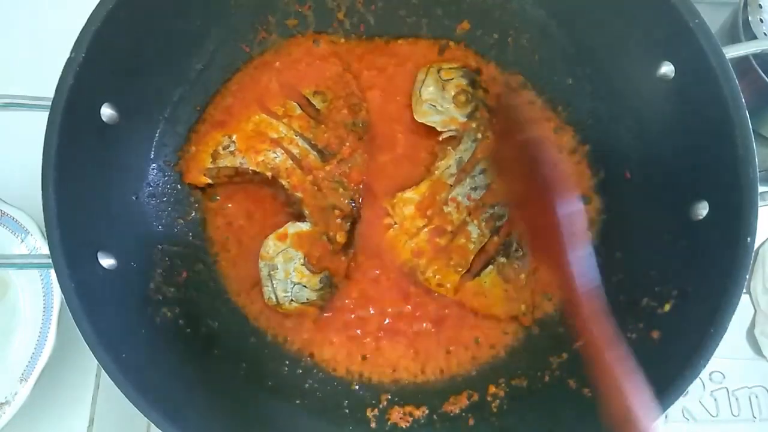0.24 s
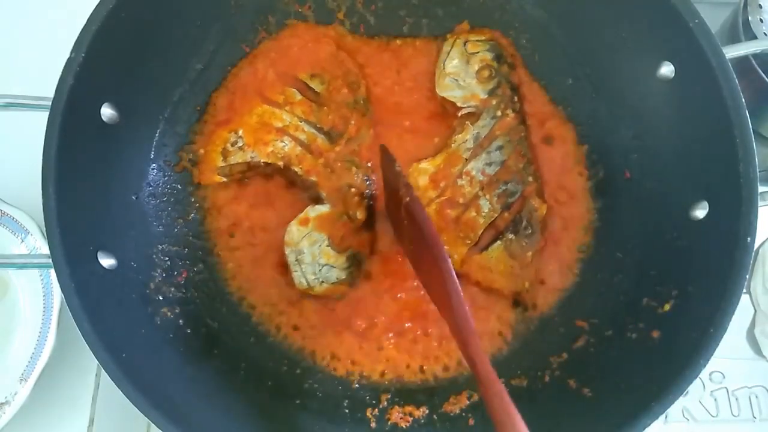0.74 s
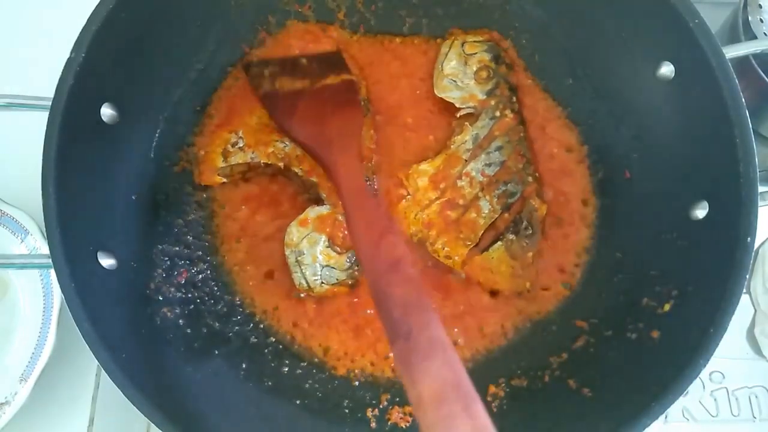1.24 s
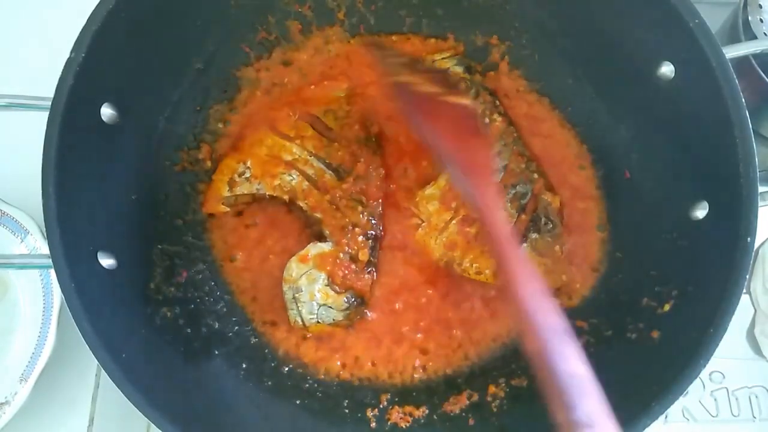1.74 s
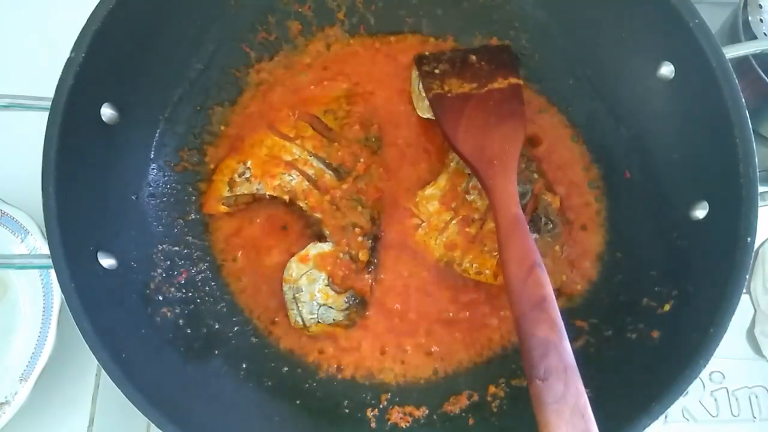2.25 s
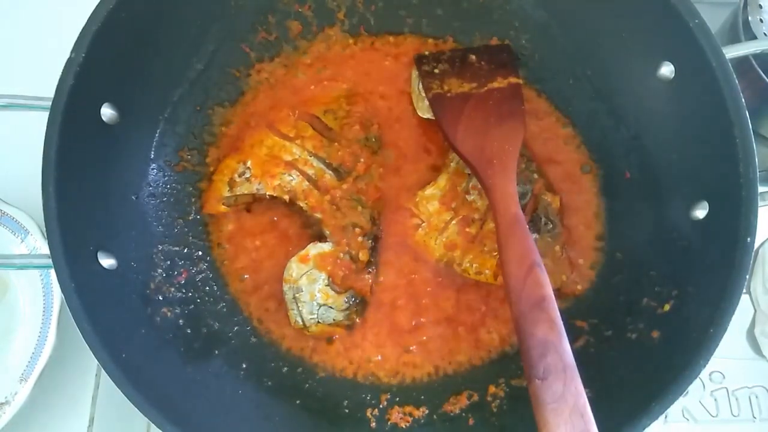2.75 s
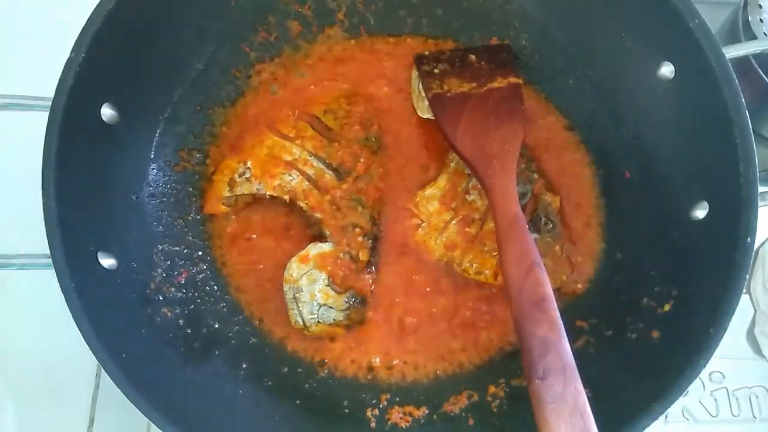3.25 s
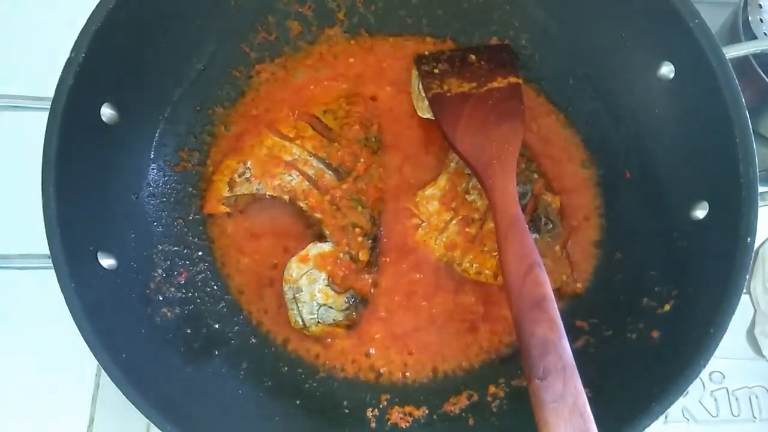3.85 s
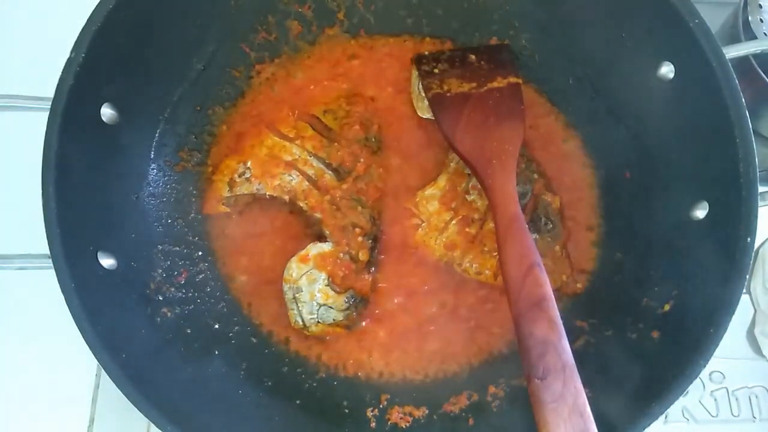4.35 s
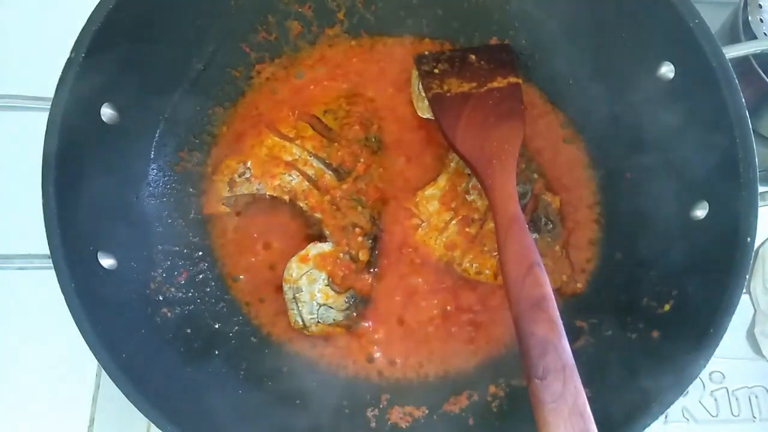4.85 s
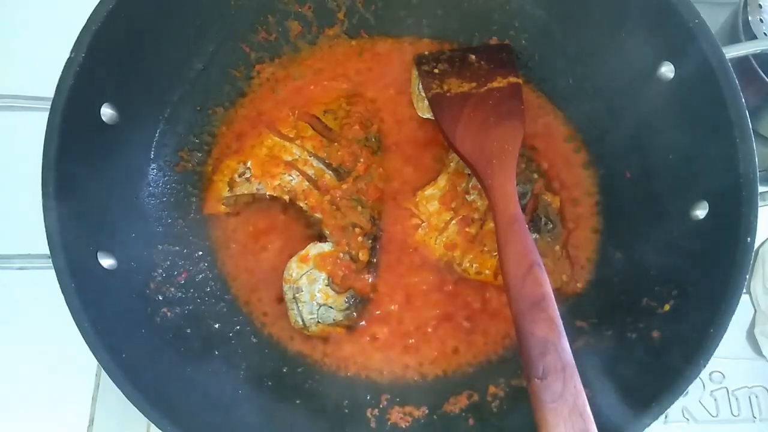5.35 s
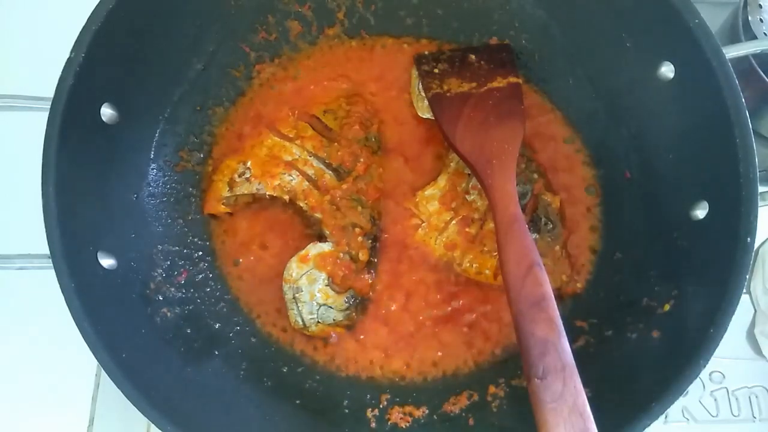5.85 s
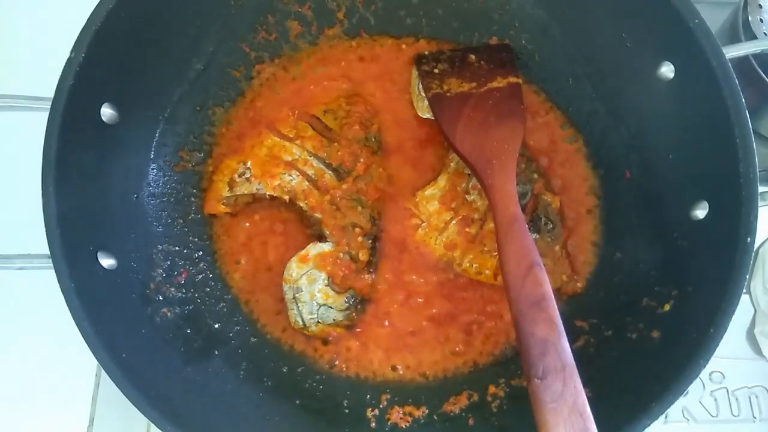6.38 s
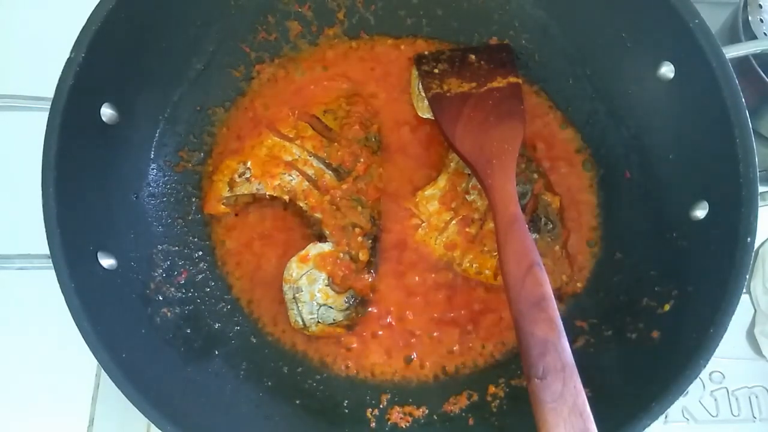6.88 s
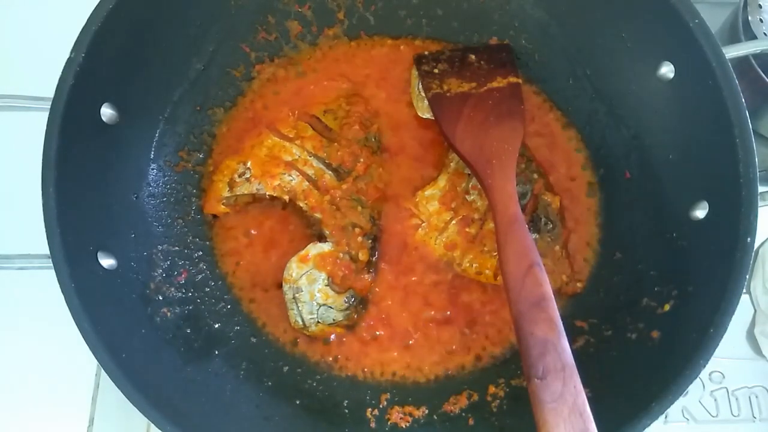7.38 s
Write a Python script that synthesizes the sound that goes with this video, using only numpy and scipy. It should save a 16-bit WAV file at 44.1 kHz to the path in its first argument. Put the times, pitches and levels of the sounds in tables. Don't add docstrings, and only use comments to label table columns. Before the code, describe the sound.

Close, crackling simmer of fish in thick sauce, popping blisters and snapping fat, with spatula thuds and clacks over a low, steady burner roar.

```python
import sys
import numpy as np
from scipy import signal
from scipy.fft import rfft, irfft
from scipy.io import wavfile
from scipy.ndimage import uniform_filter1d

SR = 44100
rng = np.random.default_rng(int(sys.argv[2]) if len(sys.argv) > 2 else 0)


def unload_audio(sound):
    columns = np.transpose(np.atleast_2d(sound))
    steps = np.round(np.clip(columns, -1, 1) * 32767)
    wavfile.write(sys.argv[1], SR, steps.astype(np.int16))


def ratio(d):
    e = np.asarray(d, float) / 20
    return 10 ** e


N = 336042

# (frequency [Hz], density [dB per Hz])
FIZZ_SPECTRUM = [(3500, -23), (5000, -10), (7000, -4.5), (8500, -2.5), (10000, 0.5), (12000, -6),
                 (13200, -4.5), (15500, -11.5), (19000, -13.5)]
# (frequency [Hz], density [dB per Hz])
BUBBLING_SPECTRUM = [(1800, -51), (2600, -6), (3200, -6.5), (3700, -9), (4200, -3.5), (6000, -5),
                     (7500, -2), (10000, -29)]
# (time [s], level [dB])
SIMMER_VIGOUR = [(0, -15.5), (.78, -15.5), (.9, -15), (1.3, -16.5), (2.1, -15), (2.4, -16), (2.85, -14.5),
                 (3.6, -15.5), (4.2, -16), (5.0, -15), (6.4, -14), (6.75, -14), (7.62, -14)]
# (time [s], lift [dB])
FIZZ_FLARES = [(.09, 2), (.31, 1), (.49, 1), (.66, 2), (.725, 3), (.80, 2.5), (.835, -1), (1.82, 0),
               (2.09, 2), (2.78, 3), (3.31, 3), (3.43, 2.5), (3.6, 1.5), (3.81, 2), (3.925, 2.5),
               (4.39, 1.5), (4.985, 3.5), (5.3, 1.5), (5.455, 2), (5.63, 0.5), (5.755, 2), (6.02, 2),
               (6.15, 2), (6.28, 2.5), (6.485, 4.5), (6.91, 4.5), (7.0, -1), (7.09, -1), (7.18, 1.5),
               (7.41, 3)]
# (time [s], lift [dB])
SAUCE_BLISTERS = [(.1, 0), (.31, 3.5), (.92, 2), (.98, 1), (1.57, 3.5), (2.275, 4.5), (2.46, 2.5),
                  (2.68, 6), (3.0, 1.5), (3.36, 3), (3.77, 5), (3.83, 4), (3.91, 4), (4.04, 3.5),
                  (4.245, 1), (4.5, 1), (4.78, 1), (5.03, 2.5), (5.355, 5.5), (5.43, 4.5), (5.51, 3),
                  (5.62, 2), (5.755, 4), (5.955, 4), (6.22, 4.5), (6.83, 3.5), (6.9, 3), (6.97, 2.5),
                  (7.25, 0), (7.56, 1.8)]
FLARE_S, BLISTER_S = 0.0086, 0.0099
BUBBLE_DB, BUBBLE_FOLLOWS = -23, 0.14
SETTLES_S, SETTLING_S, SETTLED_DB = 2.1, 0.018, 2

# (time [s], peak [dB], pitch [Hz], gain-control dip that follows [dB])
FAT_SPITS = [(0.0009, 11, 11200, 0.5), (0.123, 3, 8700, 4.5), (0.2087, 8, 8600, 0.5),
             (0.8139, 2, 9000, 4.5), (0.862, 7, 8500, -1.5), (0.8843, 6, 9300, 3), (0.8295, 3, 9000, 1.5),
             (2.416, -8, 6700, 0), (2.457, 2, 9000, 1.5), (3.0086, 4, 8600, -1), (3.182, -6, 8400, 1),
             (3.386, -5, 8800, 0), (3.6328, -1, 10100, 2.5), (4.0123, 2, 7200, 0), (4.0653, -3, 9000, 2),
             (4.3443, 3, 10000, 2.5), (4.6195, 6, 10300, 1), (4.696, 4, 9500, 0.5), (5.2833, 9, 10900, 0.5),
             (5.4722, -4, 9100, 1), (5.9426, 3, 10800, 1), (6.0552, 12, 6700, 0.5), (6.15, 9, 8900, 1),
             (6.6281, 10, 10200, 1.5), (6.665, 9, 8900, -0.5), (6.6984, 0, 10200, 2.5),
             (6.829, -1, 11300, 4.5), (6.9245, 5, 6800, 1), (7.1012, -2, 10600, 1), (7.49, -1, 9000, 1)]
SMALL_SPITS, SMALL_SPIT_DB, SMALL_SPIT_HZ = 40, 0, 9500

# (time [s], peak [dB], pitch [Hz])
HOLLOW_THUDS = [(0.129, -19, 245), (0.17, -25, 277), (0.74, -21, 256), (1.559, -28, 229), (1.872, -29, 261),
                (1.928, -33, 264), (2.089, -33, 254), (2.274, -26, 248), (2.31, -29, 243),
                (2.387, -20, 297), (2.406, -21, 270), (2.399, -24, 185), (5.836, -31, 358),
                (5.859, -30, 253), (5.926, -37, 393), (5.988, -27, 260), (6.007, -32, 296),
                (6.072, -26, 286), (6.091, -27, 205), (6.259, -32, 340), (6.309, -31, 274),
                (6.378, -25, 301), (6.509, -38, 325), (6.635, -28.5, 314)]
# (time [s], peak [dB], main mode [Hz], second mode [Hz], third mode [Hz])
WOOD_CLACKS = [(2.3, -27, 755, 1000, 1250), (2.386, -16.5, 666, 872, 991), (2.386, -21, 1480, 1260, 1760),
               (5.836, -18.5, 666, 456, 1280), (5.839, -20, 1250, 1360, 1060), (5.93, -26, 560, 420, 1170),
               (5.97, -23, 640, 613, 904), (6.008, -17, 633, 448, 890), (6.072, -24.5, 472, 694, 1000),
               (6.375, -22.5, 623, 800, 760), (6.391, -25.5, 612, 560, 730)]
THUD_T60_S, CLACK_T60_S, SCUFF_T60_S = 0.1, 0.17, 0.1

# (frequency [Hz], density [dB per Hz])
FLAME_SPECTRUM = [(60, -40), (130, -38), (200, -14), (270, -11.5), (380, -11), (500, -9.5), (750, -3),
                  (1200, 0), (2500, -2.5), (3400, -9.5), (5000, -55)]
# (frequency [Hz], width [Hz], lift [dB])
STOVE_HOLLOWS = [(260, 48, 2), (506, 7, 8.5), (636, 10, 5), (755, 75, 5), (991, 85, 4)]
FLAME_DB, FLAME_FOLLOWS = -27, 0.091

# (start [s], end [s], lift [dB])
SPATULA_STROKES = [
    (.18, .35, 12),
    (.45, .85, 9),
    (.95, 1.05, 8),
    (1.75, 1.85, 10),
    (2.05, 2.152, 12),
    (2.28, 2.65, 11),
    (5.8, 6.25, 6),
]
RUMBLE_DB, RUMBLE_FALL_DB_PER_S, STROKE_EDGE_S = -53, 0.5, 0.04

# (frequency [Hz], gain [dB])
MIC_RESPONSE = [(20, -38), (100, -19), (160, -10.5), (220, -0.9), (11000, 0.32), (12500, 1.5),
                (13000, -3.5), (15700, -0.5)]
MIC_TOP_HZ, SELF_NOISE_DB = 15740, -47.5
DUCK_ATTACK_S, DUCK_RECOVERY_S = 0.0013, 0.044
CONTRAST = 0.055
# (time [s], low edge [Hz], high edge [Hz], level [dB])
SIDE_FLECKS = [
    (.901, 8200, 9700, -30),
    (.901, 13000, 14500, -35),
    (1.737, 10300, 11800, -27),
    (2.062, 5600, 6900, -28),
    (3.711, 13000, 14500, -35),
    (4.477, 13800, 15200, -33),
]


def sizzle(fizz_db, bubble_db):
    fits = drift(16.0)
    fizz = ratio(-4.0) * bursts(FIZZ_SPECTRUM, 8000, 2.2 * fits, 4.8, 20.4, 0.78, count=16)
    fizz = fizz + ratio(-1.5) * hiss(FIZZ_SPECTRUM, 0.083 * fits, 1.3, 42.0)
    fizz = fizz + ratio(-14.0) * bursts(FIZZ_SPECTRUM, 500, 2.7 * fits, 3.0, 120.0, 1.1, count=19)
    boil = ratio(-8.0) * bursts(BUBBLING_SPECTRUM, 2500, 2.0 * fits, 2.3, 23.5, 0.59, count=13)
    boil = boil + ratio(-1.0) * hiss(BUBBLING_SPECTRUM, 0.14 * fits, 1.84, 37.0)
    boil = boil + ratio(-10.0) * bursts(BUBBLING_SPECTRUM, 300, 1.5 * fits, 1.6, 90.0, 2.3, count=19)
    return ratio(fizz_db) * fizz + ratio(bubble_db) * boil


def bursts(spectrum, per_s, fits_db, spread_db, cycles, own_db, count):
    heights_db = spread_db * np.minimum(rng.exponential(1, N), 4.2)
    sizes = ratio(heights_db) * rng.choice([-1, 1], N)
    born = sizes * (rng.random(N) < per_s * ratio(fits_db) / SR)
    pitches = np.geomspace(spectrum[0][0], spectrum[-1][0], count)
    dealt = rng.integers(0, count, N)
    out = 0
    for k, hz in enumerate(pitches):
        gain = ratio(at_hz(spectrum, hz) + own_db * drift(4.5)) * np.sqrt(hz)
        out = out + gain * unit_rms(ring(born * (dealt == k), hz, cycles / hz))
    return unit_rms(out)


def hiss(spectrum, shared_db, own_db, rate):
    out, white = 0, rng.standard_normal((2, N))
    edges = spectrum[0][0] * 2 ** np.arange(0, 9, 1 / 3)
    edges = edges[edges < spectrum[-1][0] * 1.13]
    for k, (low, high) in enumerate(zip(edges, edges[1:])):
        band = band_pass(white[k % 2], low, high)
        level_db = at_hz(spectrum, np.sqrt(low * high)) + shared_db + own_db * drift(rate)
        out = out + band * ratio(level_db)
    return unit_rms(out)


def spits():
    size = 300
    out, click = np.zeros(N + size), np.zeros(size)
    click[0] = 1
    crack = np.diff(click, prepend=0)
    chance = rng.random((SMALL_SPITS, 3))
    small_s = N / SR * chance[:, 0] ** 0.6
    small_db = SMALL_SPIT_DB + 6 * (chance[:, 1] - 0.5)
    small_hz = SMALL_SPIT_HZ * (0.78 + 0.4 * chance[:, 2])
    small = np.transpose([small_s, small_db, small_hz])
    for s, peak_db, hz in [row[:3] for row in FAT_SPITS] + list(small):
        at = round(s * SR)
        out[at:at + size] += ratio(peak_db - 3.5) * (ring(click, hz, 8.0 / hz) + 0.3 * crack)
    return out[:N]


def knocks():
    size = SR // 3
    out, t = np.zeros(N + size), np.arange(size) / SR
    for s, peak_db, hz in HOLLOW_THUDS:
        thud = np.sin(2 * np.pi * hz * (t - 1.1 * t ** 2))
        thud = thud + 0.3 * np.sin(2 * np.pi * 0.48 * hz * t)
        at = round(s * SR)
        out[at:at + size] += ratio(peak_db) * thud * knock_shape(t, 0.0052, THUD_T60_S)
    scuffs = band_pass(rng.standard_normal((len(WOOD_CLACKS), size)), 350, 2000)
    for (s, peak_db, *modes_hz), scuff in zip(WOOD_CLACKS, scuffs):
        modes = np.array([1.2, 0.7, 0.8]) @ np.sin(2 * np.pi * np.outer(modes_hz, t))
        clack = modes * knock_shape(t, 0.0016, CLACK_T60_S)
        clack = clack + 6.0 * scuff * knock_shape(t, 0.0074, SCUFF_T60_S)
        at = round(s * SR)
        out[at:at + size] += ratio(peak_db - 6.0) * clack
    return out[:N]


def knock_shape(t, rise_s, t60):
    return (1 - np.exp(-t / rise_s)) * ratio(-60 * t / t60)


def flame(flame_db):
    roar = hiss(FLAME_SPECTRUM, 0.19 * drift(19.0), 0.73, 7.2)
    for hz, width_hz, lift_db in STOVE_HOLLOWS:
        b, a = signal.iirpeak(hz, hz / width_hz, fs=SR)
        roar = roar + (ratio(lift_db) - 1) * signal.lfilter(b, a, roar)
    return ratio(flame_db - 1.6) * unit_rms(roar)


def rumble():
    t = np.arange(N) / SR
    shaken_db = 0
    for start, end, lift_db in SPATULA_STROKES:
        corners = [start - STROKE_EDGE_S, start, end, end + STROKE_EDGE_S]
        shaken_db = shaken_db + np.interp(t, corners, [0, lift_db, lift_db, 0])
    low = band_pass(rng.standard_normal(N), 110, 190)
    level_db = RUMBLE_DB - RUMBLE_FALL_DB_PER_S * t + shaken_db + 2.1 * drift(4.4)
    return ratio(level_db) * unit_rms(low)


def side_flecks():
    out, size = np.zeros(N), 2048
    for s, low_hz, high_hz, level_db in SIDE_FLECKS:
        band = band_pass(rng.standard_normal(size), low_hz, high_hz, order=6)
        at = round(s * SR) - size // 2
        out[at:at + size] += ratio(level_db + 3.0) * unit_rms(band) * np.hanning(size)
    return out * [[1], [-1]]


def swells(rows, half_s):
    t = np.arange(0, N, 20) / SR
    lift = sum(lift_db * np.exp(-((t - s) / half_s) ** 2 / 2) for s, lift_db in rows)
    return np.interp(np.arange(N) / SR, t, lift)


def drift(rate):
    r = np.exp(-80 * np.pi * rate / SR)
    slow = signal.lfilter([1], [1, -2 * r, r * r], rng.standard_normal(N // 40 + 2002))[2000:]
    slow = slow - uniform_filter1d(slow, size=150)
    return np.interp(np.arange(N) / 40, np.arange(len(slow)), unit_rms(slow))


def ring(clicks, hz, t60):
    r, w = ratio(-60 / (t60 * SR)), 2 * np.pi * hz / SR
    return signal.lfilter([0, np.sin(w)], [1, -2 * r * np.cos(w), r * r], clicks + 1e-18)


def band_pass(x, low_hz, high_hz, order=2):
    sos = signal.butter(order, [low_hz, high_hz], "band", fs=SR, output="sos")
    return signal.sosfilt(sos, x)


def at_hz(points, hz):
    points_hz, points_db = np.transpose(points)
    return np.interp(np.log(hz), np.log(points_hz), points_db)


def unit_rms(x):
    return x / np.sqrt(np.mean(x ** 2) + 1e-20)


def ducking():
    t = np.arange(0, N, 20) / SR
    dip_db = 0
    for s, _, _, depth_db in FAT_SPITS:
        after = np.maximum(t - s, 0)
        dip_db = dip_db + depth_db * (1 - np.exp(-after / DUCK_ATTACK_S)) * np.exp(-after / DUCK_RECOVERY_S)
    return ratio(-np.interp(np.arange(N) / SR, t, dip_db))


def noise_reducer(x):
    cells = signal.stft(x, nperseg=1024, noverlap=512)[2]
    power = np.abs(cells) ** 2 + 1e-14
    around = uniform_filter1d(uniform_filter1d(power, size=15, axis=0), size=3, axis=1)
    out = signal.istft(cells * (power / around) ** CONTRAST, nperseg=1024, noverlap=512)[1][:N]
    return out * np.std(x) / np.std(out)


def scene():
    t = np.arange(N) / SR
    heat_db = np.interp(t, *np.transpose(SIMMER_VIGOUR))
    swing_db = heat_db - heat_db.mean()
    settled = np.clip((t - SETTLES_S) / SETTLING_S, 0, 1)
    fizz_db = heat_db - 0.4 + swells(FIZZ_FLARES, FLARE_S)
    bubble_db = BUBBLE_DB + BUBBLE_FOLLOWS * swing_db + SETTLED_DB * settled
    bubble_db = bubble_db + swells(SAUCE_BLISTERS, BLISTER_S)
    mono = sizzle(fizz_db, bubble_db) + spits() + knocks()
    mono = mono + flame(FLAME_DB + FLAME_FOLLOWS * swing_db) + rumble()
    return np.array([mono, mono])


def band_limit(x):
    return signal.sosfilt(signal.butter(12, 16810, fs=SR, output="sos"), x)


def record(dry):
    hz = np.fft.rfftfreq(N, 1 / SR) + 1
    ducked = dry.mean(axis=0) * ducking()
    rounded = ducked / (1 + np.abs(ducked / 1.03) ** 4) ** (1 / 4)
    coloured = rfft(noise_reducer(rounded)) * ratio(at_hz(MIC_RESPONSE, hz))
    self_noise = ratio(SELF_NOISE_DB) * rng.standard_normal(N) * ratio(5.0 * drift(2.0))
    heard = irfft((coloured + rfft(self_noise)) * (hz < MIC_TOP_HZ), N)
    return band_limit(np.clip(heard + side_flecks(), -1.08, 1.08))


dry = scene()
out = record(dry)
unload_audio(out)
```